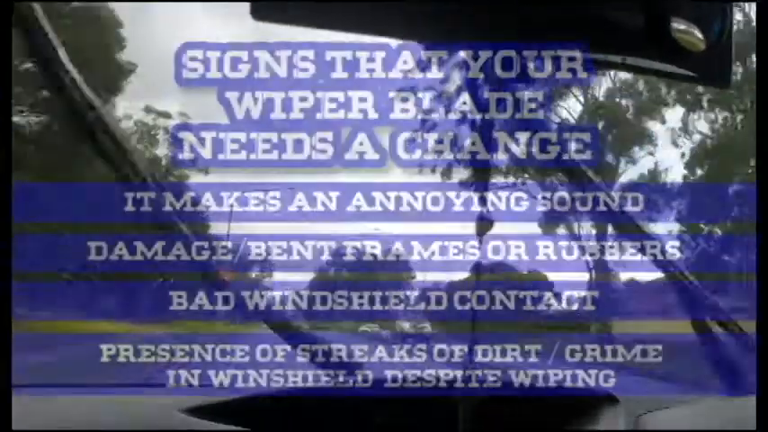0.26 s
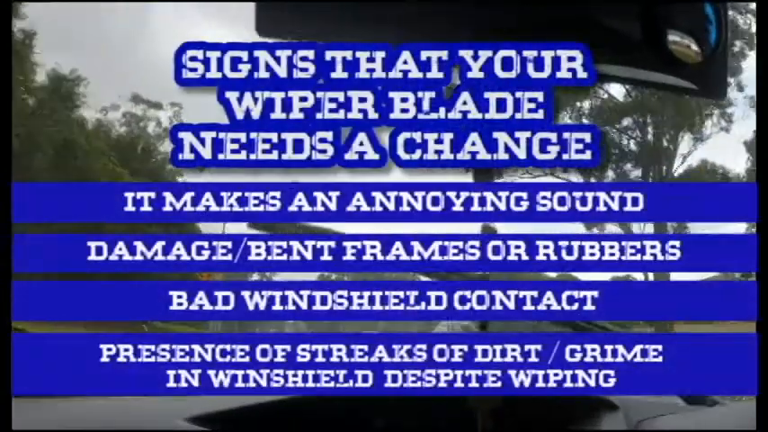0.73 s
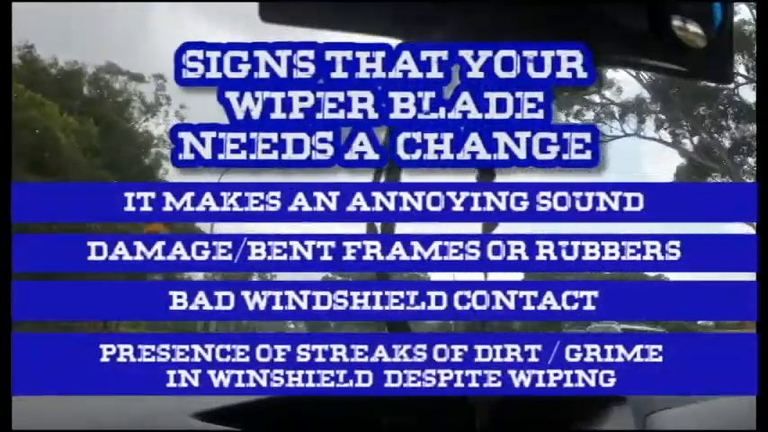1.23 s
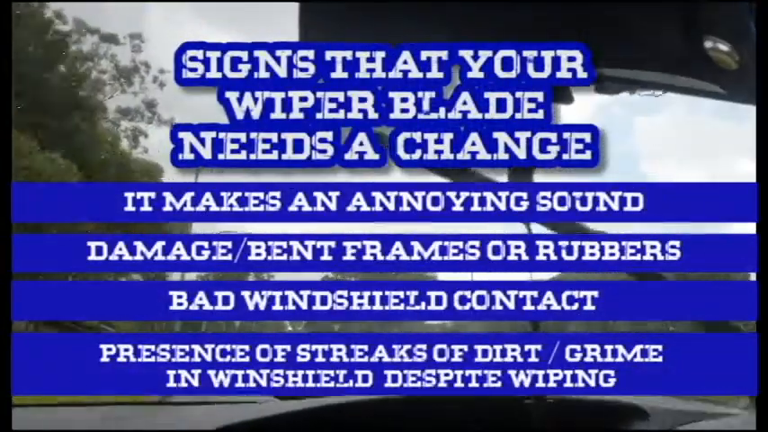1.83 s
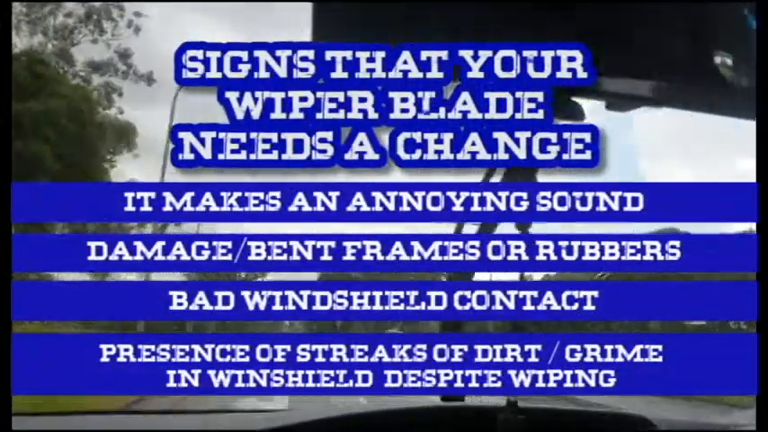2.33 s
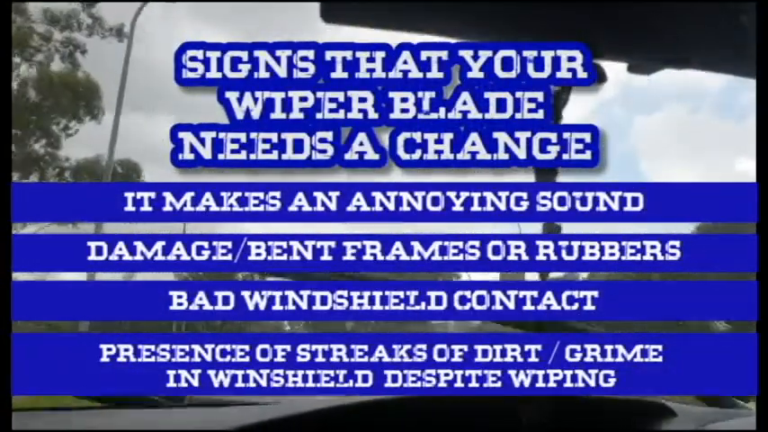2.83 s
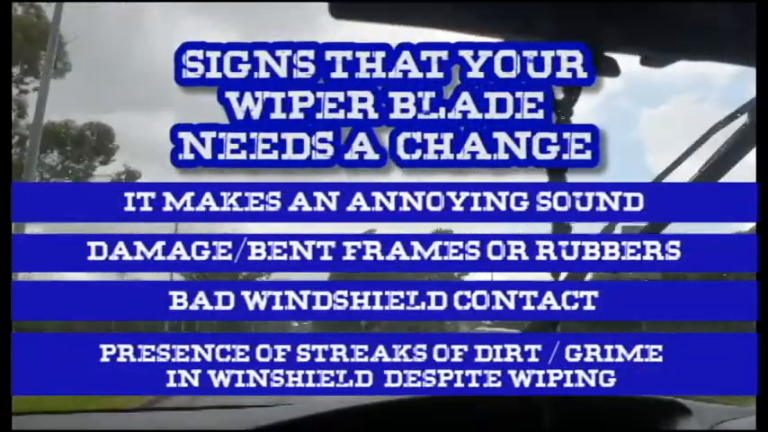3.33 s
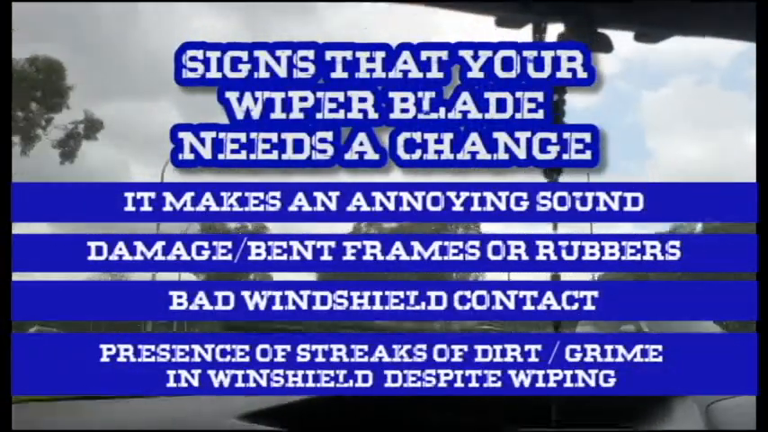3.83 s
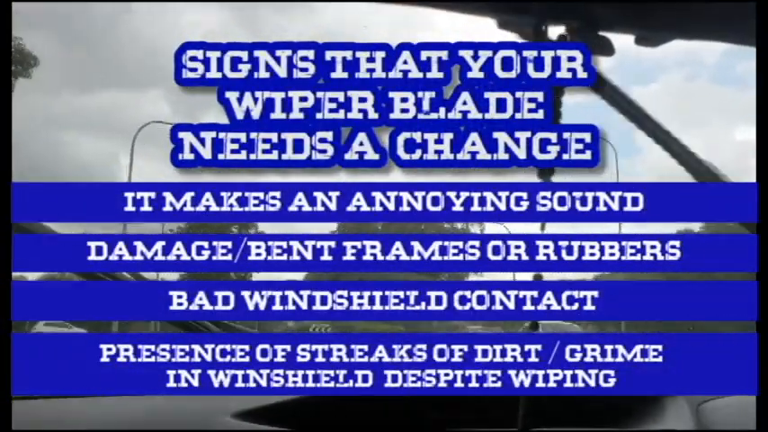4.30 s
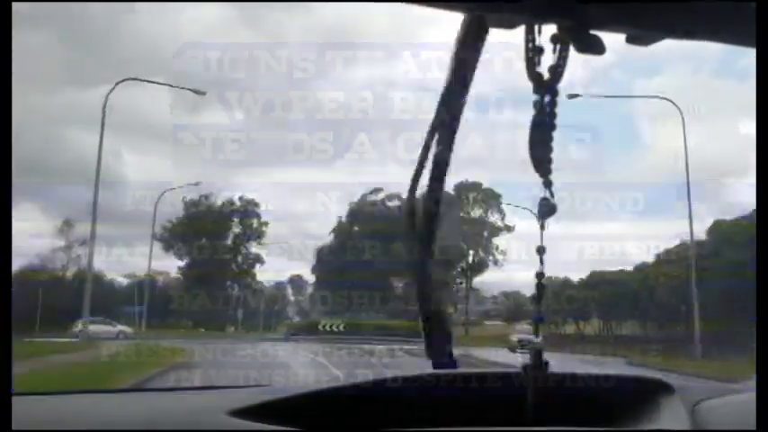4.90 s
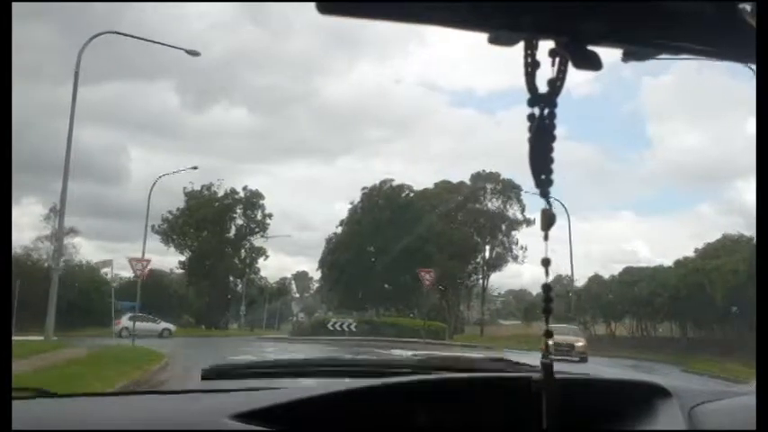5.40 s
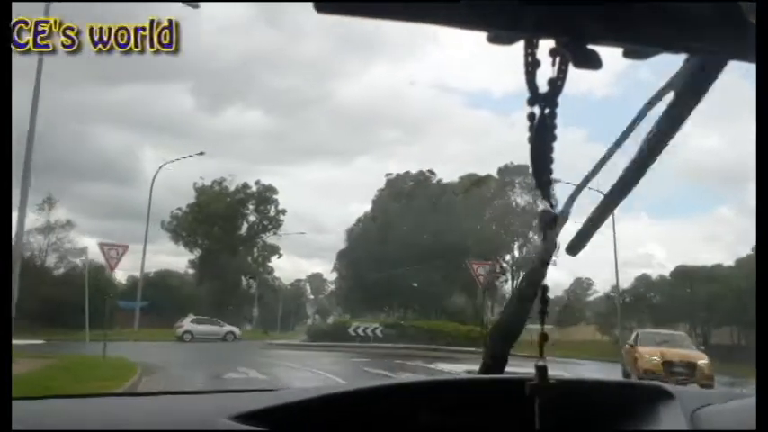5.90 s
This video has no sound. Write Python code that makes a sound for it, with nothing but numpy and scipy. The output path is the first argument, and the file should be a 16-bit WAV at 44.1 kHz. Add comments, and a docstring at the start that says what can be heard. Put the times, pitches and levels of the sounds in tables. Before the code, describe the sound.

Inside a car slowing on a wet road, heard from a small stereo microphone close behind the windscreen. Low engine boom around 55 Hz and dark tyre rumble fill the cabin throughout, the engine sinking near 41 Hz by 4.4 s and recovering slightly. Worn wiper blades drag and judder in a rubbery stutter, knocking at far turns near 1.1, 2.3, 3.6, 4.8 and 6.1 s, with lighter knocks, rubs and short squeaks between; motor whine swells faintly around 0.8, 2.1 and 3.3 s. At 1.33 s a relay ticks and the indicator lever snaps at 1.36 s; bright ticks and duller tocks then alternate about every third of a second. Thin spray hiss, droplets and specks of grit crackle in the treble, thinning late. A very heavy bass jolt hits at 4.4 s, a lesser one at 4.6, then more thuds at 5.5 and 5.7 s.

```python
"""A low engine boom over tyre rumble comes first: inside a car slowing down on a wet road, taken with a small
two-port microphone behind the windscreen. The boom is two swept sines; the rumble is noise lifted by cabin modes.
Two bumps pass under both axles and ring the chassis. Worn wiper blades drag and judder around each turn
as stick-slip pulses shake the glass. Decaying noise bursts make the relay's ticks and tocks and the snap of
its stalk; fine bursts make spray and grit crackle in the treble."""
import sys
import numpy as np
from scipy import signal
from scipy.fft import rfft, irfft
from scipy.io import wavfile
from scipy.ndimage import uniform_filter1d

SR = 44100
rng = np.random.default_rng(int(sys.argv[2]) if len(sys.argv) > 2 else 0)


def transcribe(signal):
    """Save signal, clipped to [-1, 1], as a 16-bit WAV file at the path in sys.argv[1]."""
    frames = np.atleast_2d(signal).T
    limited = np.clip(frames, -1, 1)
    pcm = np.round(limited * 32767).astype(np.int16)
    wavfile.write(sys.argv[1], SR, pcm)


N = 271339
TIME = np.arange(N) / SR

# All levels are those reaching the ports, ahead of the microphone's colour and soft ceiling.
# Engine boom in the cabin. Each row: time in seconds, mean firing rate in Hz, mean level in dB.
ENGINE_COURSE = [(0, 54.28, -30), (.2, 56.79, -32), (.55, 52.84, -27), (.78, 50.4, -26), (1.1, 54.8, -36),
                 (1.35, 56.96, -27), (1.75, 55.1, -30), (1.98, 58.2, -26), (2.1, 56.16, -36),
                 (2.25, 56, -26), (2.45, 54.24, -23.5), (2.65, 53.02, -33), (2.9, 50.2, -21),
                 (3.5, 44.46, -25.5), (3.95, 42.82, -26.5), (4.35, 41.13, -27), (4.7, 46.17, -30.5),
                 (5.1, 46.9, -35.5), (5.7, 45.78, -27), (6.15, 49.64, -32)]
ENGINE_WAVER_DB = 3

# Tyre rumble through the floor. Each row: time in seconds, mean thump level in dB, mean roar level in dB.
ROAD_COURSE = [(0.0, -29, -38.5), (0.12, -28, -38), (0.86, -27, -36), (1.03, -25, -35), (1.37, -26, -38.5),
               (1.66, -24.5, -35.5), (1.95, -27, -38), (2.26, -22.5, -34.5), (2.6, -30, -37.5),
               (3.49, -25.5, -35), (3.68, -28.5, -40.5), (4.06, -26.5, -39), (4.62, -28.5, -39),
               (4.81, -32, -37.5), (5.02, -30, -42), (5.45, -30.5, -45), (5.86, -28, -46.5),
               (6.15, -30, -40.5)]
# Tone of the rumble. Each row: frequency in Hz, relative spectral weight in dB.
RUMBLE_TONE = [(12, -40), (20, -29), (54, 1), (123, -3), (151, -6.5), (192, -16), (390, -15.5), (440, -28),
               (549, -55), (874, -33), (1010, -69), (1360, -71), (2500, -68), (3250, -78), (5500, -120)]
# Air and panel modes of the cabin. Each row: frequency in Hz, width in Hz, relative gain in dB.
CABIN_MODES = [(34.6, 9.6, -6), (128.7, 12.8, -8.5), (205.3, 26, -23), (249.6, 5.5, -29), (320, 17.6, -21),
               (384.4, 20.3, -22), (490, 29, -42), (647, 13, -33.5), (839, 7.3, -38), (1163, 42, -38)]
ROAD_WAVER_DB = 0.5
# Extra rumble under a bump, against the bump's peak
JOLT_THUMP_DB, JOLT_ROAR_DB, JOLT_RISE_S = -10.5, -28.5, 0.014

# Wheels meeting a ridge. Each row: start in seconds, peak in dB.
WHEEL_BUMPS = [(4.386, -6.5), (4.609, -13), (5.465, -12), (5.534, -27), (5.735, -14.5)]
# Chassis under the cabin. Each row: frequency in Hz, relative level in dB, 60 dB decay in seconds.
CHASSIS_MODES = [(46, -5, 0.36), (68.8, -4, 0.16), (110.9, -16.5, 0.47), (142, -3, 0.058)]

# One wiper cycle: a rub at the near turn, a climb to the far one.
# Each row: time from the far turn in seconds, drag and scrape levels in dB ahead of the turn's offsets.
WIPER_CYCLE = [(-.72, -49, -62), (-0.56, -44, -81), (-.545, -31.5, -43), (-0.49, -41, -52),
               (-0.384, -48, -53.5), (-0.277, -37, -50.5), (-0.103, -42.5, -54.5), (-0.0805, -29.5, -42.5),
               (-0.035, -25, -36.5), (0.0043, -20.5, -32), (0.038, -37.5, -52), (0.08, -44, -59.5),
               (.52, -44, -59)]
# Far turns of the blades. Each row: time in seconds, drag offset in dB, scrape offset in dB.
FAR_TURNS = [(-.15, 3, 4), (1.089, 1, -0.5), (2.333, 0.5, 0), (3.574, -1, -2), (4.822, -4.5, -3.5),
             (6.065, -2.5, -2)]
# Windscreen close to the microphone. Each row: frequency in Hz, width in Hz, relative gain in dB.
GLASS_MODES = [(171, 37, 3.5), (286, 47, 1), (471, 106, -4), (719, 88, -4), (875, 90, -6), (1133, 93, -7.5)]
# Scrape of the rubber. Each row: frequency in Hz, width in Hz, relative gain in dB.
SCRAPE_MODES = [(1290, 360, 8.5), (1820, 870, -6), (4650, 1200, -34)]
# The dash, shaken with the drag. Each row: frequency in Hz, width in Hz, relative gain in dB.
LINKAGE_MODES = [(125, 58, -0.17), (174.3, 45.7, -1.8)]
LINKAGE_DB = 0.5
JUDDER_HZ = 109.76  # centre of an uneven slip rate
# Wiper motor whine under load. Each row: time of the swell in seconds, level in dB.
MOTOR_WHINES = [(0.829, -36.5), (2.071, -39), (3.301, -38.5)]
WHINE_HZ, WHINE_S = 475, 0.052  # pitch, half length of a swell
# Short rubs and squeaks, mostly of the rubber.
# Each row: centre in seconds, pitch in Hz, level at the centre in dB, half length in seconds.
RUBBER_SQUEAKS = [(0.543, 1300, -44, 0.012), (0.597, 1500, -40, .008), (0.933, 860, -36, .015),
                  (0.955, 1150, -38.5, 0.013), (1.788, 1250, -36.5, 0.02), (3.056, 1596, -48, 0.012),
                  (4.257, 1739, -44, 0.0065), (4.281, 1010, -36, 0.013), (4.312, 1450, -38, 0.011),
                  (4.331, 1265, -33, 0.011), (4.501, 2530, -43, 0.0073), (4.548, 1260, -40, 0.0062),
                  (4.594, 697, -36, 0.016), (5.543, 920, -38, 0.014), (5.572, 1454, -42, 0.0087)]
# Blades flip over and knock at the ends of a sweep. Each row: start in seconds, peak in dB.
BLADE_KNOCKS = [(.53, -25), (1.02, -18), (1.082, -10), (1.78, -19), (2.325, -13), (3.03, -16.5),
                (3.555, -14.5), (3.573, -11.5), (4.277, -19), (4.812, -15), (5.535, -24), (6.055, -13.5)]
# Wiper arm. Each row: frequency in Hz, relative level in dB, 60 dB decay in seconds.
ARM_MODES = [(173.2, 1.5, 0.1), (315, 1.5, 0.049), (482, -10, 0.13), (716, -17.5, 0.018),
             (996, -17.5, 0.065), (1255, -16, 0.035)]

# Relay closing, a bright tick. Each row: start in seconds, strike strength in dB.
RELAY_TICKS = [(1.325, -23), (1.9914, -27), (2.6699, -22.5), (3.3505, -23.5), (4.0269, -24), (4.7061, -28),
               (5.3842, -26), (6.0621, -27)]
# Relay opening, a duller tock. Each row: start in seconds, strike strength in dB.
RELAY_TOCKS = [(1.6521, -24), (2.3321, -24), (3.0096, -21.5), (3.689, -23), (4.3665, -22), (5.0454, -28),
               (5.7234, -25.5)]
# Relay case on closing. Each row: frequency in Hz, width in Hz, gain in dB.
TICK_CASE = [(6500, 7700, -11), (7800, 270, -10), (9070, 700, 1.5), (10984, 1100, -3), (12000, 500, -0.5),
             (14700, 3600, -1.5)]
# Relay case on opening. Each row: frequency in Hz, width in Hz, gain in dB.
TOCK_CASE = [(1770, 50, 16.5), (2200, 460, 3.5), (6400, 380, 5.5), (7050, 430, -0.5), (7900, 300, 10.5),
             (8820, 250, 10.5), (9350, 190, -16), (13200, 3000, -11.5)]
# The lever snaps in quick steps. Each row: start in seconds, strength of the burst in dB.
STALK_STEPS = [(1.3615, -28), (1.3645, -21), (1.3675, -16), (1.371, -24.5), (1.378, -23)]
STALK_T60_S = 0.021

# Spray under the car. Each row: time in seconds, mean coarse level in dB, mean fine level in dB.
SPRAY_COURSE = [(0, -44.5, -52), (.2, -39, -45), (.42, -44.5, -48), (.7, -39, -47), (.9, -43.5, -50),
                (1.15, -42, -51), (1.33, -39.5, -41), (1.51, -45.5, -51), (1.58, -41.5, -46),
                (1.72, -40.5, -45), (1.88, -45, -45), (1.98, -40, -38), (2.12, -41, -42), (2.4, -41.5, -44),
                (2.48, -47, -47.5), (2.68, -39.5, -43), (2.83, -45, -52), (2.95, -38, -38.5),
                (3.17, -39, -42), (3.46, -44, -47.5), (3.76, -42.5, -48), (3.87, -40, -44),
                (3.97, -46, -55), (4.03, -44, -44), (4.24, -44, -49.5), (4.31, -47, -53),
                (4.38, -43.5, -46), (4.6, -46.5, -49), (5.12, -44.5, -37.5), (5.56, -49, -47),
                (5.6, -54, -56), (5.7, -55.5, -59), (5.82, -47, -54), (5.92, -54.5, -51), (6.05, -48, -44),
                (6.11, -61, -69), (6.15, -46, -56)]
# Single loud specks of grit. Each row: start in seconds, strength of the burst in dB.
GRIT_SPECKS = [(0.602, -36), (0.8675, -37), (1.3001, -37), (1.6926, -32), (2.225, -32), (2.5103, -33.5),
               (2.6233, -32), (2.858, -33), (2.8858, -35), (3.93, -32), (4.2836, -32), (4.4103, -35),
               (5.7524, -37.5), (5.83, -39)]
SPRAY_WAVER_DB, FINE_WAVER_DB = .7, 0.4
FLING_DB, FLING_S = -44.5, 0.018  # water thrown off the blades at the far turn: level, half length

# Likeness of the two ports. Each row: frequency in Hz, likeness from -1 to 1.
PORT_LIKENESS = [(30, 0.77), (60, 0.8), (300, 0.79), (640, 0.52), (1200, -.1), (3000, 0)]
# Colour of each port. Each row: frequency in Hz, left gain in dB, right gain in dB.
PORT_COLOUR = [(101, 1.66, 4), (1370, -5.5, -4), (1900, -6.5, -4.5), (3310, -5, 0), (4200, -1.5, 3),
               (5060, 1, 0.5), (6100, 3.5, 2), (7300, -4.5, 5), (7980, -2, -0.5), (8600, -4.5, -5),
               (9680, -25, -1.5), (10740, -6.5, 3.5), (12100, -6, 1), (14100, -8.5, -4.5), (15500, -11, -6)]
TOP_HZ = 15700


def engine():
    """Firing-rate boom and its octave, a little unsteady; the far side of the cabin booms apart."""
    hz, db = curve(ENGINE_COURSE)
    phase = 2 * np.pi * np.cumsum(hz * (1 + 0.03136 * walk(20))) / SR
    boom = np.sqrt(2) * np.sin(phase) + undb(-6.5) * np.sin(2 * phase)
    far_side = level(band(rng.standard_normal(N), 50.3, 4.4), 0)
    return undb(db + ENGINE_WAVER_DB * walk(9)) * pair(boom, far_side)


def road():
    """Tyre noise through the floor, lifted at the cabin modes; thump and roar jump at each bump."""
    hz, weight_db = np.transpose(RUMBLE_TONE)
    noise = rng.standard_normal((2, 2, N))
    broad = level(shape(noise[0], undb(across(hz, weight_db))), -0.45)
    cabin = level(sum(undb(db) * band(noise[1], f, width) for f, width, db in CABIN_MODES), -5.5)
    thump, roar = split(pair(*(broad + cabin)), 218)
    thump_db, roar_db = curve(ROAD_COURSE) + ROAD_WAVER_DB * walk(8)
    jolt = np.zeros(N)
    for s, peak_db in WHEEL_BUMPS:
        since = (TIME - s).clip(0) / JOLT_RISE_S
        jolt += undb(peak_db) * since * np.exp(1 - since)
    thump_gain = undb(thump_db) + undb(JOLT_THUMP_DB) * jolt
    roar_gain = undb(roar_db) + undb(JOLT_ROAR_DB) * jolt
    return thump_gain * thump + roar_gain * level(roar, 0)


def bumps():
    """Each wheel's blow on the ridge rings the chassis modes."""
    return ring(WHEEL_BUMPS, CHASSIS_MODES, 0.0084, 0.29)


def wipers():
    """Stick-slip shakes the glass, which rings on; motor, squeaks and knocks join in."""
    drag, scratch = sweeps()
    rub = judder()
    glass = shake(rub, drag, GLASS_MODES)
    scrape = shake(rub, scratch, SCRAPE_MODES)
    linkage = undb(LINKAGE_DB) * shake(rub, drag, LINKAGE_MODES)
    knocks = ring(BLADE_KNOCKS, ARM_MODES, 0.0026, 0.5)
    return pair(*(glass + scrape + linkage)) + motor() + squeaks() + knocks


def sweeps():
    """Drag and scrape gains: the same cycle around every turn, offset in level."""
    s, *columns = np.transpose(WIPER_CYCLE)
    gains = []
    for k, cycle_db in enumerate(columns):
        turns_db = [np.interp(TIME - turn[0], s, cycle_db, -120, -120) + turn[k + 1] for turn in FAR_TURNS]
        gains.append(sum(undb(db) for db in turns_db))
    return gains


def judder():
    """Rubber sticks and slips at uneven moments, over a flickering rub that differs at each port."""
    cycles = np.cumsum(JUDDER_HZ * undb(3 * walk(40))) / SR
    slips = np.diff(np.floor(cycles), prepend=0) * undb(2.0 * rng.standard_normal(N))
    flicker = level(rng.standard_normal((2, N)), 0) * undb(2.96 * walk(80))
    return level(slips, -4.1) + flicker


def motor():
    """Two steady tones swell as the motor takes load."""
    load = sum(undb(db) * np.exp(-((TIME - s) / WHINE_S) ** 2) for s, db in MOTOR_WHINES)
    upper = undb(-2.5) * np.sin(2 * np.pi * 1.45 * WHINE_HZ * TIME)
    return load * (np.sin(2 * np.pi * WHINE_HZ * TIME) + upper)


def squeaks():
    """Brief swells of narrow-band noise at the pitch of each rub."""
    noise = rng.standard_normal((2, N))
    out = np.zeros((2, N))
    for s, hz, db, half_s in RUBBER_SQUEAKS:
        out += np.exp(-((TIME - s) / half_s) ** 2) * level(band(noise, hz, 0.12 * hz), db)
    return out


def indicator():
    """The stalk snaps in bursts of noise; the relay ticks and tocks."""
    stalk = crack(hits(STALK_STEPS), STALK_T60_S)
    ticks = relay(RELAY_TICKS, TICK_CASE, 0.0012, 0.063)
    tocks = relay(RELAY_TOCKS, TOCK_CASE, 0.0025, 0.042)
    return stalk + ticks + tocks


def relay(events, modes, rattle_s, t60_s):
    """The contact rattles briefly: noise builds over rattle_s, fades, and rings the plastic case."""
    slew = 1 / (rattle_s * SR)
    strength = signal.lfilter([slew], [1, slew - 1], decay(hits(events), t60_s))
    burst = strength * rng.standard_normal((2, N))
    return sum(undb(db) * band(burst, hz, width) for hz, width, db in modes)


def spray():
    """A flickering hiss under a patter of small drops of uneven size; it comes in gusts, with grit."""
    coarse_db, fine_db = curve(SPRAY_COURSE) + SPRAY_WAVER_DB * walk(9)
    fling = undb(FLING_DB) * sum(np.exp(-((TIME - turn[0]) / FLING_S) ** 2) for turn in FAR_TURNS)
    hiss = crack(undb(1.8 * walk(35)), .001)
    # about 400 drops a second
    drops = (rng.random(N) < 400 / SR) * undb(2.0 * rng.exponential(size=N).clip(0, 4))
    patter = crack(drops, 0.0068)
    coarse, fine = split(level(hiss, -0.24) + level(patter, -1.8), 10080)
    coarse_gain = undb(coarse_db) + fling
    fine_gain = undb(fine_db + FINE_WAVER_DB * walk(11))
    grit = crack(hits(GRIT_SPECKS), 0.068)
    return coarse_gain * level(coarse, 0) + fine_gain * level(fine, 0) + grit


def ring(events, modes, rise_s, scatter_db):
    """Each blow rings the same decaying modes, in another mix at each port."""
    out = np.zeros((2, N))
    hz, db, t60 = np.array(modes).T[:, :, None]
    t = np.arange(int(t60.max() * SR)) / SR
    chance = rng.standard_normal((len(events), 2, 2, len(modes), 1))
    for (s, peak_db), (level_draw, phase_draw) in zip(events, chance):
        strength = undb(db + scatter_db * level_draw) * 1000. ** (-t / t60)
        # the scatter number also spreads the phases, in radians
        tones = strength * np.sin(2 * np.pi * hz * t + scatter_db * phase_draw)
        blow = tones.sum(axis=1) * (1 - np.exp(-t / rise_s))
        blow *= undb(peak_db) / np.abs(blow).max()
        i = int(s * SR)
        out[:, i:i + len(t)] += blow[:, :N - i]
    return out


def shake(force, gain, modes):
    """A force that swells with gain rings the modes; rms 1 at gain 1."""
    def through(x):
        """Neighbouring modes move in opposite senses."""
        return sum((-1) ** k * undb(db) * band(x, hz, width) for k, (hz, width, db) in enumerate(modes))
    return through(gain * force) / through(force).std()


def crack(impulses, t60_s):
    """Each impulse starts a burst of bright noise that dies away, unrelated at the two ports."""
    bright = signal.butter(2, 1800, "high", fs=SR, output="sos")
    return decay(impulses, t60_s) * signal.sosfilt(bright, rng.standard_normal((2, N)))


def decay(impulses, t60_s):
    """Exponential fade from every impulse, 60 dB down after t60_s."""
    return signal.lfilter([1], [1, -1000. ** (-1 / (t60_s * SR))], impulses)


def hits(events):
    """Impulses of the given strengths."""
    out = np.zeros(N)
    s, db = np.transpose(events)
    out[(s * SR).astype(int)] = undb(db)
    return out


def pair(x, y):
    """Two ports that share x in the bass and differ by y higher up."""
    alike = across(*np.transpose(PORT_LIKENESS)).clip(-1, 1)
    mid = shape(x, np.sqrt(1 + alike))
    side = shape(y, np.sqrt(1 - alike))
    return np.array([mid + side, mid - side]) / np.sqrt(2)


def walk(rate):
    """Random levels held 1 / rate s and slewed twice; spread near 1."""
    k = int(SR / rate)
    held = np.repeat(rng.standard_normal(N // k + 1), k)
    return 1.3 * uniform_filter1d(uniform_filter1d(held, k), k)[:N]


def band(x, hz, width_hz):
    """Two-pole resonance, gain 1 at the centre."""
    return signal.lfilter(*signal.iirpeak(hz, hz / width_hz, SR), x)


def split(x, hz):
    """Low and high part."""
    return [signal.sosfilt(signal.butter(4, hz, kind, fs=SR, output="sos"), x) for kind in ("low", "high")]


def shape(x, gain):
    """Weight the spectrum."""
    return irfft(rfft(x) * gain, N)


def across(hz, values):
    """Values joined on a log-frequency axis, one for each FFT bin."""
    bins_hz = np.arange(N // 2 + 1) * SR / N
    return np.interp(np.log(bins_hz + 1), np.log(hz), values)


def curve(table):
    """Columns of a table over time."""
    s, *columns = np.transpose(table)
    return [np.interp(TIME, s, c) for c in columns]


def level(x, db):
    """Scale to an rms level."""
    return x * undb(db) / np.sqrt(np.mean(x ** 2))


def undb(db):
    """dB to gain."""
    return 10 ** (np.asarray(db) / 20)


def scene():
    """All sources as they reach the two ports."""
    return engine() + road() + bumps() + wipers() + indicator() + spray()


def record(dry):
    """Each port's own colour, a soft ceiling, then the steep top cut."""
    hz, left_db, right_db = np.transpose(PORT_COLOUR)
    coloured = shape(dry, undb([across(hz, left_db), across(hz, right_db)]))
    limited = np.tanh(0.81 * coloured) / 0.78
    return signal.sosfilt(signal.ellip(12, .2, 80, TOP_HZ, fs=SR, output="sos"), limited)


dry = scene()
out = record(dry)
transcribe(out)
```